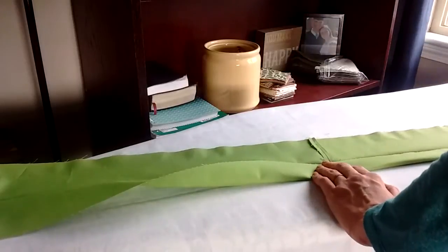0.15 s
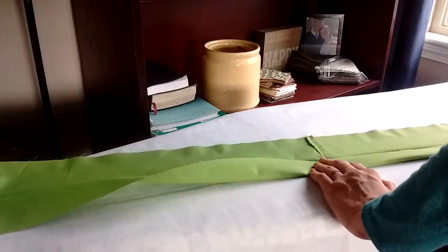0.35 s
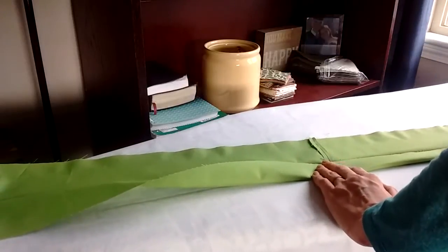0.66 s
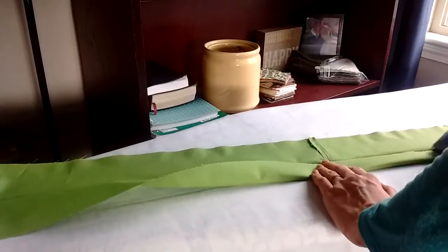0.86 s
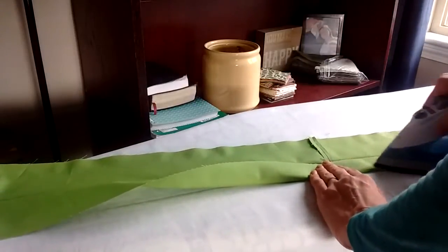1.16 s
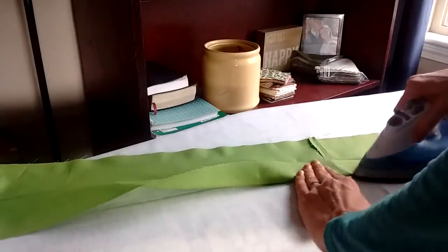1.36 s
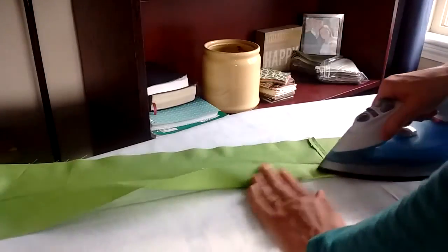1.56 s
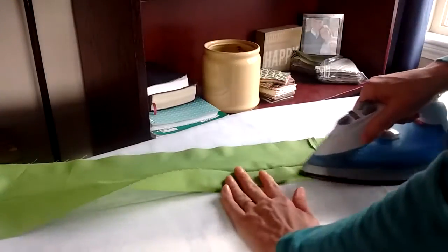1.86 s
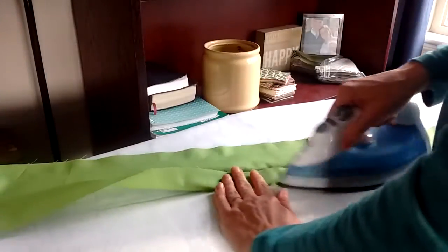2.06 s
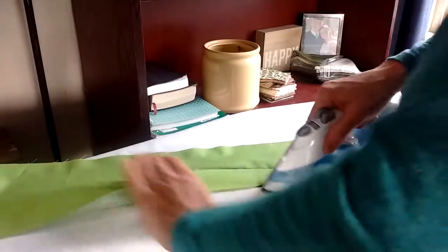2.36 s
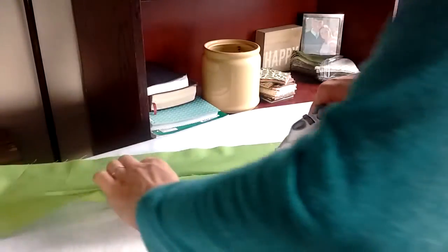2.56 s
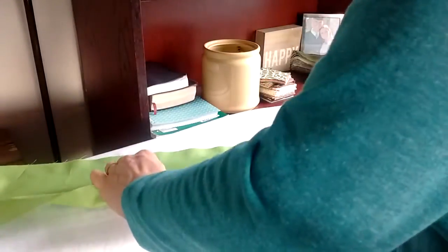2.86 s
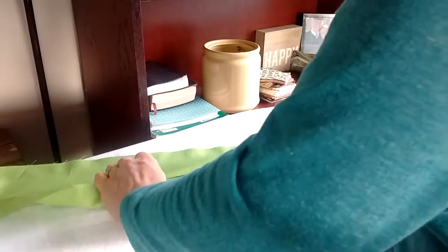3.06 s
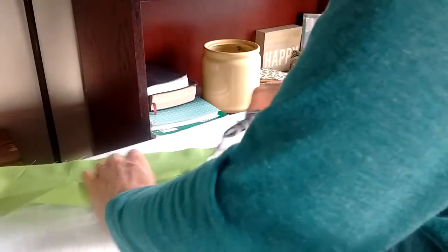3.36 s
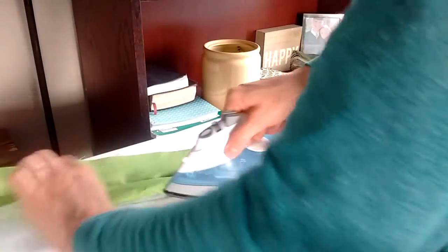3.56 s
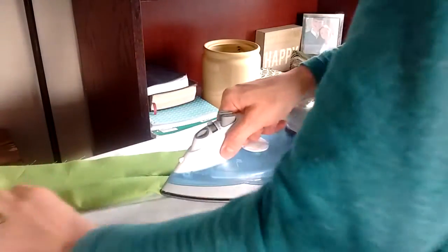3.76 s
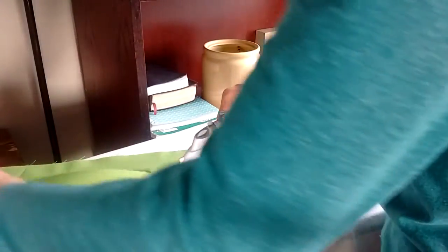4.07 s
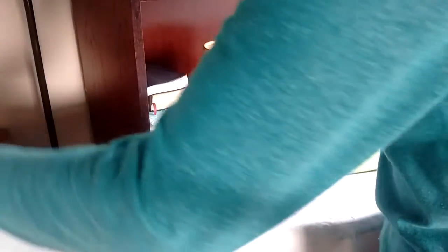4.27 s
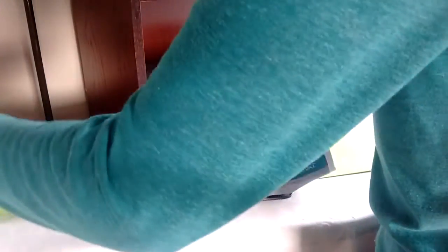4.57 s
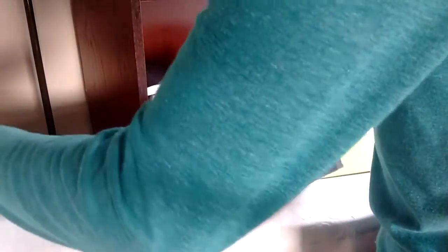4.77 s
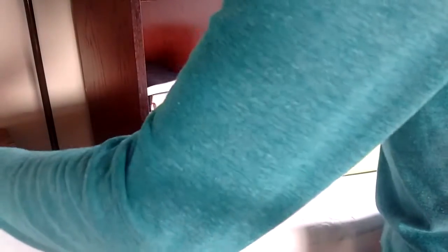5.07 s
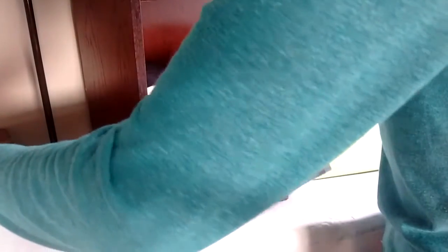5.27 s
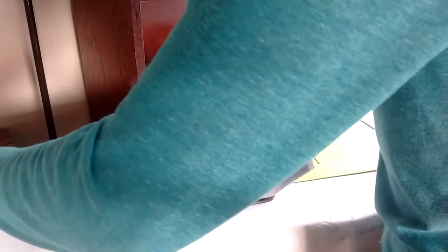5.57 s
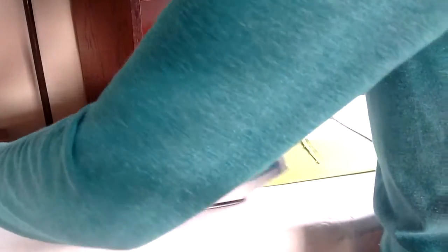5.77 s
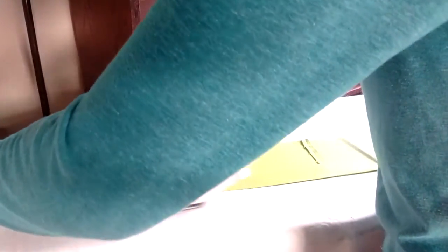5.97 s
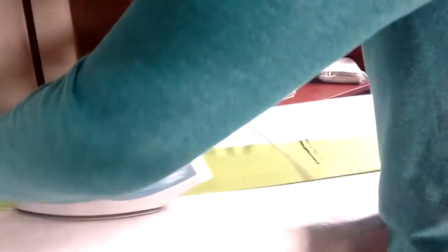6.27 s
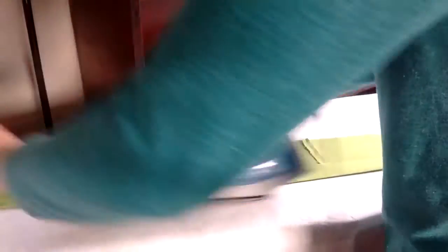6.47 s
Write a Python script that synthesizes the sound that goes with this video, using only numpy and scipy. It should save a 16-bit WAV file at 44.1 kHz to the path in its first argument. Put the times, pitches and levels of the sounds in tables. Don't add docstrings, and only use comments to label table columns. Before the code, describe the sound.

Close up in a small furnished room, a steam iron gives a short puff, then clacks and rattles as it is lifted and set down with a heavy, hollow boom on a padded board. A second landing follows with bright clacks. Soft steam hiss then continues, with isolated ticks and a tiny creak, flaring late before a few final knocks and puffs.

```python
import sys
import numpy as np
from scipy import signal
from scipy.fft import rfft, irfft, next_fast_len
from scipy.io import wavfile
from scipy.ndimage import uniform_filter1d

SR = 44100
rng = np.random.default_rng(int(sys.argv[2]) if len(sys.argv) > 2 else 0)


def boost(x):
    u = np.asarray(x, float) / 20
    return 10 ** u


def output_pcm(signal):
    pcm = np.clip(np.atleast_2d(signal).T, -1, 1) * 32767
    wavfile.write(sys.argv[1], SR, np.round(pcm).astype(np.int16))


N = 292287


def rms_one(x):
    return x / np.sqrt(np.mean(x ** 2) + 1e-20)


def in_time(rows):
    s, *columns = np.transpose(rows)
    return [np.interp(np.arange(N) / SR, s, column) for column in columns]


def at_hz(points, hz):
    table_hz, values = np.transpose(points)
    return np.interp(np.log(hz + 1), np.log(table_hz), values)


def drift(rate_hz):
    r = np.exp(-80 * np.pi * rate_hz / SR)
    white = rng.standard_normal(N // 40 + 2002)
    slow = signal.lfilter([1], [1, -2 * r, r * r], white)[2000:]
    return np.interp(np.arange(N) / 40, np.arange(len(slow)), rms_one(slow))


def swells(rows):
    t = np.arange(N) / SR
    return sum(boost(db) * np.exp(-((t - s) / length_s) ** 2) for s, length_s, db in rows)


def ring(force, hz, t60_s):
    r, w = boost(-60 / (t60_s * SR)), 2 * np.pi * hz / SR
    return signal.lfilter([0, np.sin(w)], [1, -2 * r * np.cos(w), r * r], force + 1e-18)


def resound(x, hz, width_hz):
    r = np.exp(-np.pi * width_hz / SR)
    zeros = (1 - r * r) / 2 * np.array([1, 0, -1])
    return signal.lfilter(zeros, [1, -2 * r * np.cos(2 * np.pi * hz / SR), r * r], x)


def hiss(peaks, patchy_db, rate_hz):
    white = rng.standard_normal((2, 2, N))
    out = np.zeros((2, N))
    for k, (hz, width_hz, db) in enumerate(peaks):
        once = resound(white[k % 2], hz, 1.43 * width_hz)
        twice = resound(once, hz, 1.43 * width_hz)
        out += boost(db + patchy_db * drift(rate_hz)) * twice
    return rms_one(out)


def micro_hits(shape):
    white = rng.standard_normal(shape)
    return white * boost(4.0 * rng.exponential(1, shape[-1]).clip(0, 3))


def struck(force, modes, colour_db, smooth_s):
    out = sum(boost(db + extra_db) * ring(force, hz, t60_s) for extra_db, (hz, db, t60_s) in zip(colour_db, modes))
    power = uniform_filter1d(np.mean(out ** 2, axis=0), int(smooth_s * SR))
    return out / np.sqrt(power.max())


def place(out, s, sound):
    i = round(s * SR)
    out[:, i:i + sound.shape[1]] += sound


# frequency in Hz, level in dB per Hz.
RUMBLE = [(20, -28), (40, -10), (100, -1), (175, -2.5), (250, -4), (400, -12), (700, -22), (1200, -26),
          (2500, -34.5), (4000, -42), (8000, -41.5)]
# peak in seconds, level in dB.
SURGES = [
    (1.9, -53),
    (3.62, -55),
    (5.12, -49),
    (6.55, -57),
]
# peak in seconds, length in seconds, level in dB.
SHIFTS = [
    (1.05, 0.38, -39.5),
    (2.06, 0.094, -49),
    (2.42, 0.22, -58),
    (4.1, 0.045, -53),
    (5.08, 0.31, -48),
    (6.08, 0.073, -48),
    (6.6, 0.17, -54),
]
NEAR_PORT = [
    [1.3],
    [.45],
]


def room_tone():
    white = rng.standard_normal((2, N))
    shared = white + 0.44 * white[::-1]
    rumble = irfft(rfft(shared) * boost(at_hz(RUMBLE, np.fft.rfftfreq(N, 1 / SR))), N)
    shift = swells(SHIFTS[1:])
    legs_gain = boost(-55) + boost(-8) * shift
    motor_gain = boost(-58) + swells([(s, 0.17, db) for s, db in SURGES])
    legs = legs_gain * hiss([(44.3, 57, 0)], patchy_db=-1.0, rate_hz=5.1)[0]
    frame = boost(-3) * shift * hiss([(282.5, 56, -2.5), (501, 44, -7)], patchy_db=1.5, rate_hz=3.5)
    motor = motor_gain * hiss([(178, 10, 0)], patchy_db=1.5, rate_hz=3)
    return boost(-47) * rms_one(rumble) + NEAR_PORT * (legs + frame + motor) * boost(-1.5)


MEAN_FLOW_DB, MEAN_PRESSURE_DB = -50, -62
# frequency in Hz, level in dB, t60 in seconds.
BOARD = [(131, 0, .26), (146, -13, .2), (62, -17, .1)]
# start in seconds, level in dB.
WORK = [(0, -42), (.6, -54.5), (.8, -49), (1.0, -47), (1.6, -49.5), (2.2, -48), (2.6, -48), (3.0, -47),
        (3.2, -53), (3.6, -45), (4.2, -53), (4.55, -47), (4.79, -39.5), (4.92, -49), (5.25, -45),
        (5.92, -49), (6.06, -45), (6.63, -42.5)]


def board_hum():
    push = rng.standard_normal(N) * boost(1.0 * drift(9.4))
    work_db = in_time(WORK)[0] - MEAN_FLOW_DB
    shaken = boost(-57 + 0.77 * work_db) + boost(-7) * swells(SHIFTS)
    hum = sum(boost(db) * ring(push, hz, t60_s) for hz, db, t60_s in BOARD)
    return shaken * rms_one(hum) * [[1.4], [.55]]


# start in seconds, level in dB.
BOOMS = [
    (0.344, -42),
    (0.559, -40),
    (0.614, -35.5),
    (0.907, -17),
    (1.228, -42),
    (1.326, -25.5),
    (5.049, -51),
    (5.124, -39),
    (6.311, -33),
    (6.503, -45),
]


def booms():
    out, t = np.zeros((2, N + SR)), np.arange(SR // 2) / SR
    load = np.sin(np.pi * np.clip(t / 0.03, 0, 1))
    push = load * (.3 + np.sin(2 * np.pi * BOARD[0][0] * t))
    drum = struck(push * [[1], [0]], BOARD, [0, 0, 0], smooth_s=0.029)
    for s, db in BOOMS:
        place(out, s, boost(db - 1.5) * drum)
    return out[:, :N]


# start in seconds, length in seconds, level in dB.
CREAK = (2.699, .033, -36.5)
# frequency in Hz, width in Hz, level in dB.
CREAK_RING = [(3080, 60, 3), (4080, 70, 0), (2720, 90, -12), (2250, 200, -14), (5450, 120, -21),
              (520, 80, -16), (750, 80, -20)]


def creak():
    start_s, length_s, db = CREAK
    t = np.arange(N) / SR - start_s
    release_db = -9 * (t > length_s) - 400 * np.clip(t - length_s, 0, 1)
    return boost(db) * (t > 0) * boost(release_db) * hiss(CREAK_RING, patchy_db=1.0, rate_hz=60)


# frequency in Hz, level in dB, t60 in seconds.
FRAME = [(245, 1, .08), (300, 1, .06), (370, 2, .06), (470, 1, .05), (600, -4, .035), (710, -6, .04),
         (900, -10, .03), (1100, -13, .02)]
# start in seconds, level in dB, rattle t60 in seconds.
KNOCKS = [
    (.345, -31.5, 0.17),
    (.559, -38.5, 0.26),
    (.731, -38.5, 0.089),
    (0.9181, -30, 0.14),
    (1.231, -27, 0.072),
    (1.263, -44, 0.074),
    (2.092, -55, .03),
    (5.134, -46, 0.1),
    (5.9391, -46, .13),
    (6.0216, -43, 0.52),
]


def frame_knocks():
    out, t = np.zeros((2, N + SR)), np.arange(SR // 4) / SR
    for s, db, t60_s in KNOCKS:
        force = micro_hits((1, len(t))) * boost(-60 * t / t60_s) * [[1], [-.3]]
        luck_db = 1.5 * rng.standard_normal(len(FRAME))
        place(out, s, boost(db - 1.5) * struck(force, FRAME, luck_db, smooth_s=.008))
    return out[:, :N]


# frequency in Hz, level in dB, t60 in seconds.
CLACK = [(1180, -26, 0.039), (1376, -34, 0.012), (1467, 7, 0.029), (1550, 3, 0.032), (1750, 4, 0.023),
         (1950, 16.5, 0.012), (2180, 15.5, 0.024), (2350, 13, 0.05), (2630, 24, 0.011), (2830, -2, 0.035),
         (3070, 25.5, 0.01)]
# frequency in Hz, level in dB, t60 in seconds.
TICK = [(3520, 4, 0.019), (3770, -24, .009), (3940, 1, 0.013), (4040, 12, 0.011), (4350, 10, 0.0099),
        (4690, 13.5, 0.007), (5306, 8, 0.017), (6110, 19.5, 0.0048), (7370, 7, 0.0075), (8600, 11, 0.0041),
        (8100, 5, 0.0051), (9830, 3.5, 0.015), (13400, -5, 0.0027)]
# start in seconds, clack in dB, clack centre in Hz, tick in dB, rattle t60 in s.
HITS = [(0.344, -39.5, 2470, -40.5, 0.18), (0.421, -39, 3200, -33, 0.13), (0.487, -33.5, 1880, -52, 0.038),
        (.559, -38.5, 1250, -42, 0.21), (.615, -27.5, 2380, -28, 0.094), (0.639, -39, 2320, -63, 0.18),
        (.731, -47, 2210, -43.5, 0.095), (0.917, -30, 1440, -40.5, 0.1), (1.024, -43, 2000, -50, 0.096),
        (1.072, -47, 2800, -41, 0.022), (1.173, -31, 2040, -47, 0.008), (1.3196, -34, 1950, -35, 0.069),
        (1.328, -32, 2000, -22.5, 0.096), (1.334, -27.5, 1550, -24, 0.12), (1.426, -39, 1750, -45, 0.071),
        (1.4556, -38, 1750, -36.5, 0.024), (2.086, -33, 2130, -36, 0.02), (2.1996, -27, 2330, -27, 0.0036),
        (3.3897, -33.5, 1940, -39, 0.012), (5.9389, -46, 2820, -39, 0.18), (6.0218, -39, 2500, -45, 0.21),
        (6.32, -43, 2500, -40, 0.085), (6.363, -47, 2500, -34, 0.031), (6.464, -31.5, 1950, -27.5, 0.014)]


def shell_contacts():
    out, t = np.zeros((2, N + SR)), np.arange(SR // 4) / SR
    crack = 0.47 * boost(-60 * t / 0.0033)
    mode_hz = np.array(CLACK)[:, 0]
    for s, clack_db, centre_hz, tick_db, t60_s in HITS:
        clack_luck, tick_luck = rng.standard_normal((2, len(TICK)))
        clack_force = micro_hits((2, len(t))) * (boost(-60 * t / (1.1 * t60_s)) + crack)
        tick_force = micro_hits((2, len(t))) * (boost(-60 * t / (.9 * t60_s)) + crack)
        place_db = -17.0 * np.abs(np.log2(mode_hz / centre_hz))
        clack_colour_db = place_db + 1.2 * clack_luck[:len(CLACK)]
        clack = boost(clack_db - 2.1) * struck(clack_force, CLACK, clack_colour_db, smooth_s=.003)
        tick = boost(tick_db - 2.1) * struck(tick_force, TICK, 1.8 * tick_luck, smooth_s=.002)
        place(out, s, clack + tick)
    return out[:, :N]


def walls(x, t60_s, wet_db):
    t = np.arange(int(.4 * SR)) / SR
    dull = signal.lfilter([.4], [1, -.6], rng.standard_normal((2, len(t))))
    tail = dull * boost(-60 * t / t60_s) * (t > .004)
    tail = tail / np.sqrt(np.sum(tail ** 2, axis=1, keepdims=True))
    return boost(wet_db) * signal.fftconvolve(x, tail, axes=1)[:, :N]


# start in seconds, rise in seconds, wide hiss in dB, jet in dB, release in dB per second.
PUFFS = [
    (0.011, 0.027, -34.5, -40.5, 251),
    (6.016, 0.015, -55, -48.5, 21),
    (6.312, 0.011, -52, -45, 45),
]


def puffs():
    start_s, rise_s, wide_db, jet_db, fall = np.transpose(PUFFS)[:, :, None]
    hold_s = 0.031
    t = np.arange(N) / SR - start_s
    shape = np.clip(t / rise_s, 0, 1) ** 2 * boost(-fall * np.clip(t - rise_s - hold_s, 0, None))
    shape[:-1] *= t[1:] < 0
    return np.sum(boost(wide_db) * shape, axis=0), np.sum(boost(jet_db) * shape, axis=0)


# start in seconds, flow in dB, pressure behind the covered vents in dB, strongest jet in Hz.
STEAM = [(.1, -56.5, -77, 1550), (.8, -58.5, -74, 2500), (1.4, -52, -60.5, 2630), (1.8, -51, -74, 2710),
         (2.2, -52, -61, 2850), (2.6, -49, -66, 2420), (2.92, -48.5, -54.5, 2240),
         (3.2, -49.5, -63.5, 2770), (3.6, -48, -58, 2660), (4.1, -48.5, -72, 2730),
         (4.45, -50, -63.5, 2750), (4.78, -41, -46.5, 2910), (4.88, -48.5, -66.5, 2680),
         (5.3, -46.5, -57.5, 2140), (5.9, -47, -66, 2090), (6.08, -50.5, -62, 2550),
         (6.42, -48.5, -64, 2620), (6.63, -45, -74, 2550)]


def jet(width_hz=400, size=256):
    _, pressure_db, hz = in_time(STEAM)
    out, state = rng.standard_normal((2, N)), np.zeros((2, 2, 2))
    r = np.exp(-np.pi * width_hz / SR)
    for i in range(0, N, size):
        section = [1, 0, -1, 1, -2 * r * np.cos(2 * np.pi * hz[i] / SR), r * r]
        out[:, i:i + size], state = signal.sosfilt([section, section], out[:, i:i + size], zi=state)
    _, jet_burst = puffs()
    level = boost(-59 + 1.22 * (pressure_db - MEAN_PRESSURE_DB)) + jet_burst
    return level * boost(1.7 * drift(5.7)) * rms_one(out)


# frequency in Hz, width in Hz, level in dB.
RUSH = [(378, 213, -2), (544, 250, -1), (724, 490, -5.5), (1256, 1240, -9)]
# frequency in Hz, width in Hz, level in dB.
VENTS = [(1780, 360, -4.5), (2040, 550, -2.5), (2500, 750, 0), (3060, 300, -2)]
# frequency in Hz, width in Hz, level in dB.
WHISTLE = [(4977, 220, -1.5), (4270, 1750, -11)]
# frequency in Hz, width in Hz, level in dB.
FIZZ = [(4290, 1700, 2), (7600, 7500, 6), (9000, 2300, -9), (13000, 7200, -2.5)]
# start in seconds, level in dB.
EDGE_LEAK = [(.2, 1), (1.0, 2), (1.4, 6), (1.9, 1.5), (2.2, 5.5), (2.4, -1), (3.0, -1.5), (3.45, 2),
             (3.9, -4.5), (4.45, 0), (4.9, -1.5), (5.6, -2), (5.9, 3.5), (6.63, 3.5)]


def steam():
    flow_db, pressure_db, _ = in_time(STEAM)
    flow_db, pressure_db = flow_db - MEAN_FLOW_DB, pressure_db - MEAN_PRESSURE_DB
    work_db, leak_db = in_time(WORK)[0] - MEAN_FLOW_DB, in_time(EDGE_LEAK)[0]
    burst, jet_burst = puffs()
    rush_gain = boost(-57.5 + work_db) + boost(-8.5) * burst
    vent_gain = boost(-54.5 + flow_db) + burst
    whistle_gain = boost(-62.5 + 0.67 * pressure_db) + boost(-9) * jet_burst
    fizz_gain = boost(-60 + 0.46 * flow_db + leak_db) + boost(-10.5) * jet_burst
    gusts = boost(0.23 * drift(28))
    rush = rush_gain * hiss(RUSH, patchy_db=1.5, rate_hz=3.3) * NEAR_PORT
    vents = vent_gain * hiss(VENTS, patchy_db=0.2, rate_hz=3)
    whistle = whistle_gain * hiss(WHISTLE, patchy_db=1.0, rate_hz=15)
    fizz = fizz_gain * hiss(FIZZ, patchy_db=0.64, rate_hz=2.9)
    return gusts * (rush + vents + whistle + fizz)


def scene():
    far_port_db = -4.5
    knocks = shell_contacts() + frame_knocks()
    near = knocks + walls(knocks, t60_s=0.33, wet_db=-7.5) + creak() + booms() + steam() + jet() + board_hum()
    return (near + room_tone()) * boost(np.array([[0], [far_port_db]]))


# frequency in Hz, phase in turns.
CROSS_TURNS = [(0, 0), (300, .035), (600, .1), (1000, .24), (1500, .5), (2150, .75), (3050, 1), (6350, 2),
               (9350, 3), (10300, 3.35), (12600, 3.7), (13900, 4), (15400, 4.5), (22050, 6)]
# frequency in Hz, share of the other port.
CROSS_GAIN = [(30, .78), (130, .84), (500, .84), (1500, .55), (3000, .62), (5200, .6), (6300, .86),
              (7500, .6), (9300, .5), (11500, .2), (14000, .55), (15500, .7)]


def cross_feed(dry):
    size = next_fast_len(N + 64)
    hz = np.fft.rfftfreq(size, 1 / SR)
    share = np.clip(at_hz(CROSS_GAIN, hz), 0, .98)
    cross = share * np.exp(-2j * np.pi * np.interp(hz, *np.transpose(CROSS_TURNS)))
    ports = rfft(dry, size)
    return irfft(ports - cross * ports[::-1], size)[:, :N]


def top_cut(x):
    return signal.sosfilt(signal.butter(12, 15740, fs=SR, output="sos"), x)


def record(dry):
    wide = cross_feed(dry)
    wide = signal.sosfilt(signal.cheby2(10, 50, 16050, fs=SR, output="sos"), wide)
    return top_cut(wide)


dry = scene()
out = record(dry)
output_pcm(out)
```